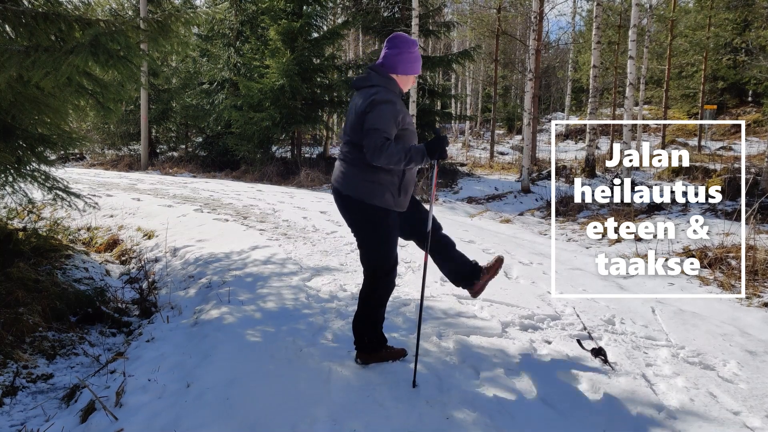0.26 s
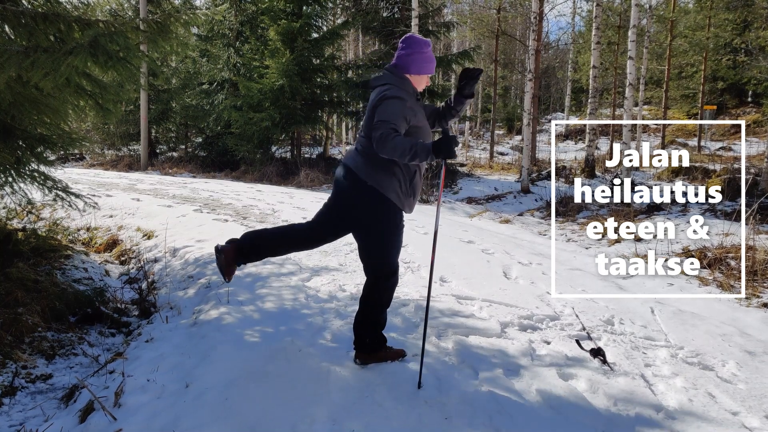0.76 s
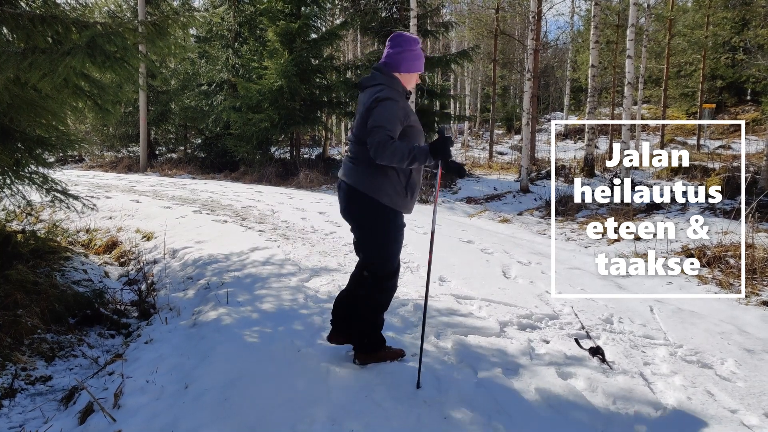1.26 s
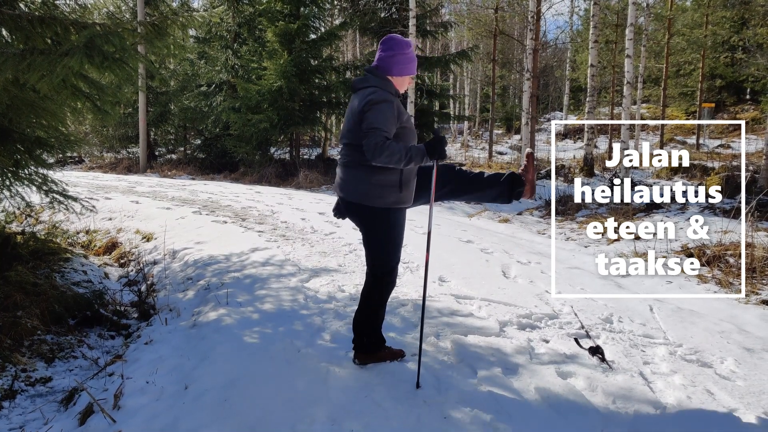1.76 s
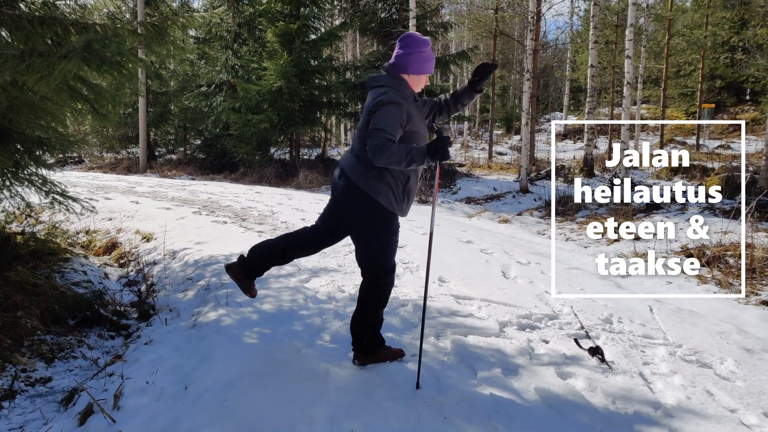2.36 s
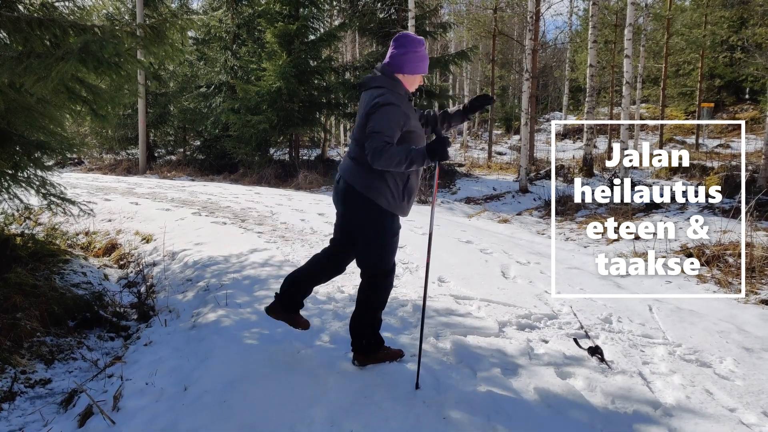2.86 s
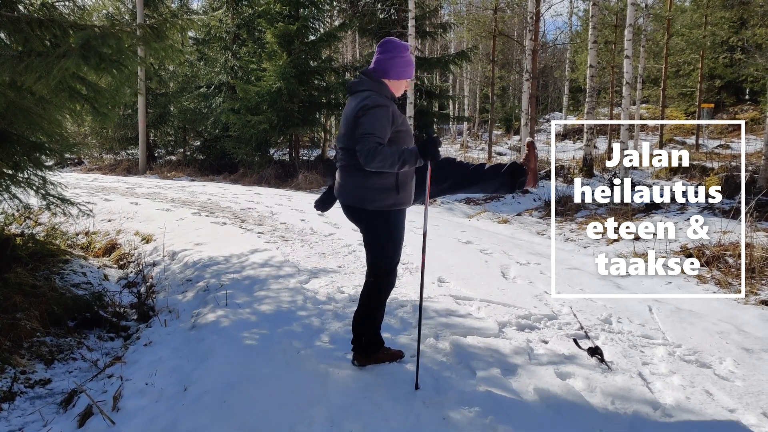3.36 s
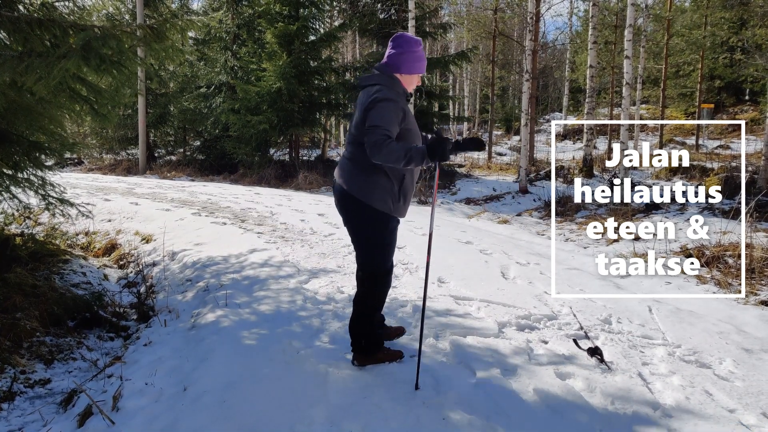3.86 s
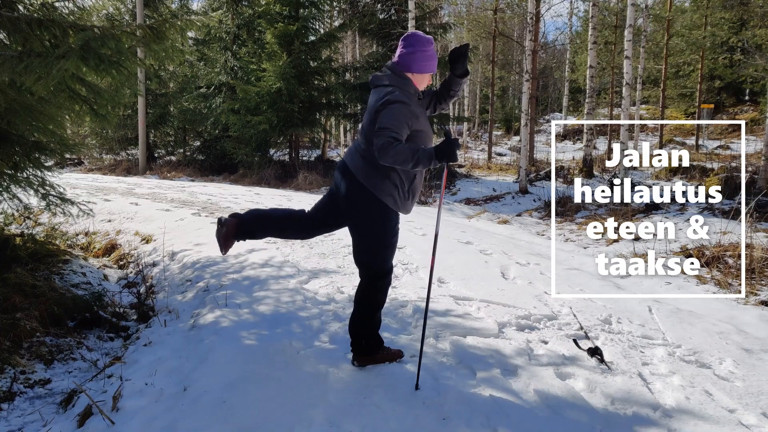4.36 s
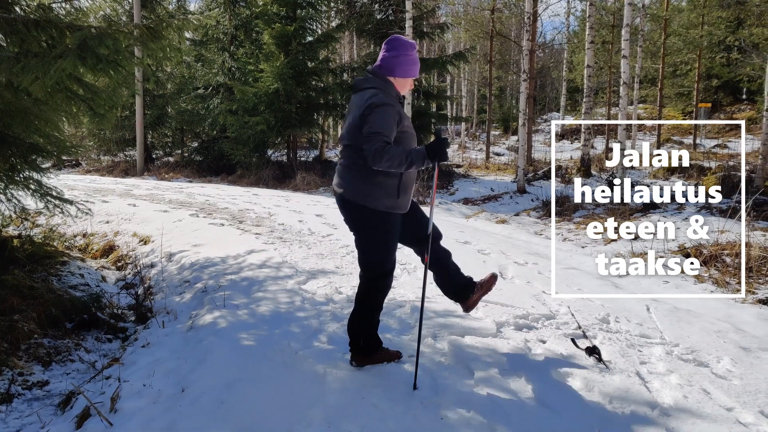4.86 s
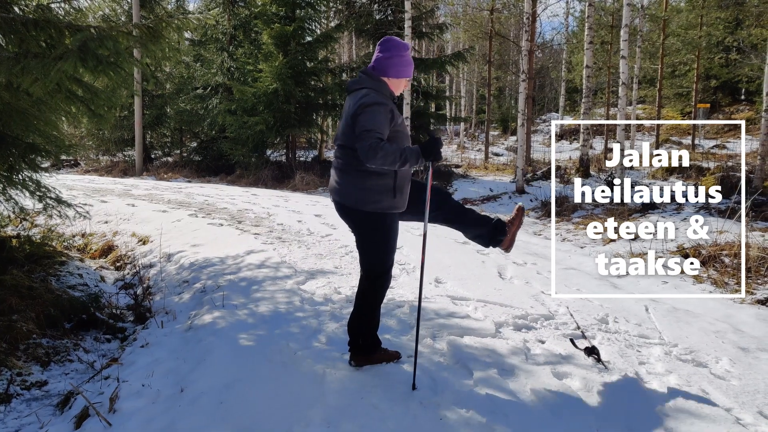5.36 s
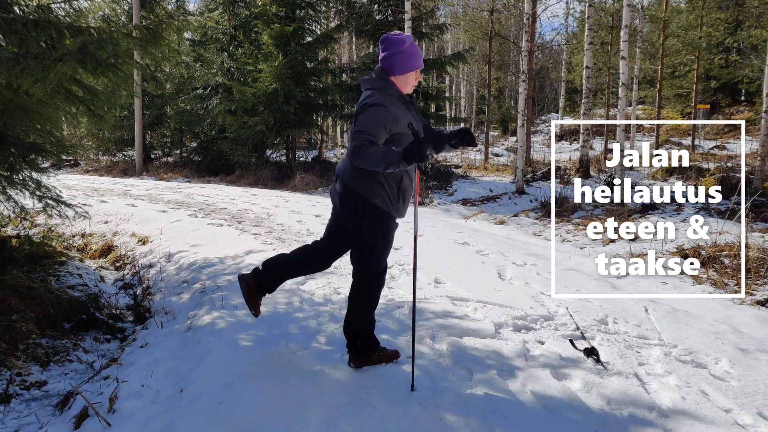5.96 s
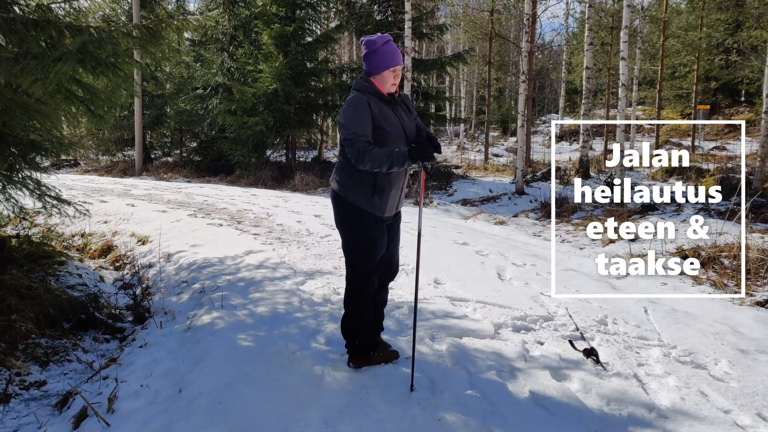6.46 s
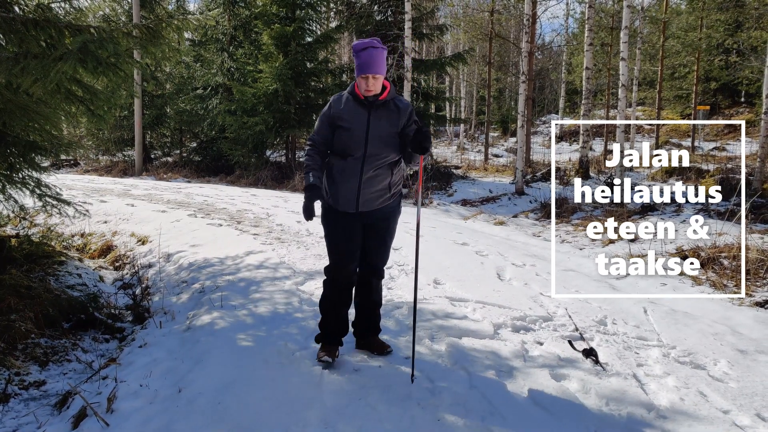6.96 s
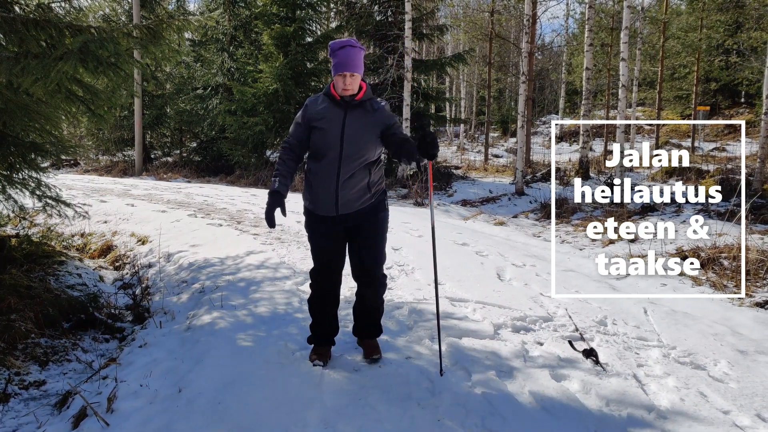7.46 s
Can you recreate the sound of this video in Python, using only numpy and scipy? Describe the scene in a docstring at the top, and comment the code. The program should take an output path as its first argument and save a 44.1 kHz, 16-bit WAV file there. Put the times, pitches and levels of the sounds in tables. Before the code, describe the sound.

Low wind buffets the microphone, strongest at the start, on a snowy forest path. Over it a songbird repeats a clear descending two-note whistle about three times a second, in a short run and then a longer one, with a slight echo. Far birds answer faintly, trees hush, and someone's clothes and boots make a barely audible rustle and crunch late on. The forest sounds sit to the right; the left carries only wind, hiss and a few ticks.

```python
"""A snowy forest. A small bird repeats a two-note falling whistle, a nearly pure tone from its syrinx
that trunks and needles scatter; other birds answer faintly from further off. The trees hush, and
someone exercising on the path rustles and crunches the snow. Turbulent wind buffets both microphones.
The left one is muffled: it picks up only wind, its own hiss and a few sharp ticks."""
import sys
import numpy as np
from scipy import signal
from scipy.fft import rfft, irfft
from scipy.io import wavfile
from scipy.ndimage import uniform_filter1d

SR = 44100
rng = np.random.default_rng(int(sys.argv[2]) if len(sys.argv) > 2 else 0)


def bounce(signal):
    """Save signal as a 16-bit WAV file at the path given by the first command-line argument."""
    frames = np.transpose(np.atleast_2d(signal))
    limited = np.clip(frames, -1, 1)
    pcm = np.round(limited * 32767).astype(np.int16)
    wavfile.write(sys.argv[1], SR, pcm)


N = 339981
TIME = np.arange(N) / SR


def near_bird(leap_s=.011, top_hz=8060, flick_at_s=.099, fall_at_s=.104):
    """Frequency modulation in the syrinx: each phrase is a leap, a swoop, a tiny flick and a fall."""
    # phrases: (time [s], swoop level [dB], glide time [s], plateau pitch [Hz], fall level [dB],
    #   fade [dB/s], first pitch [Hz], last pitch [Hz], bend [1 = straight], dip depth [Hz],
    #   dip time [s], second voice relative to the fall [dB])
    phrases = [(-.045, -26.5, 0.066, 5245, -33, 117, 5300, 4200, 1.8, 0, .015, -12),
               (.299, -30, .05, 5470, -29, 136, 5480, 4270, 2.05, 0, .015, -15),
               (.64, -27, 0.059, 5300, -29, 109, 5180, 4130, 1.35, 80, 0.048, -20),
               (.995, -26.5, 0.064, 5266, -30.5, 105, 5070, 4080, 1.3, 148, 0.016, -4),
               (1.35, -25, .047, 5400, -29.5, 125, 5060, 4136, 1.56, 40, .018, -11),
               (3.189, -35, 0.06, 5340, -36, 95, 5240, 4160, 1.7, 60, 0.018, -12),
               (3.522, -31, 0.049, 5230, -36, 55, 4980, 4020, 1.05, 90, 0.044, -16),
               (3.875, -27, 0.051, 5226, -28, 115, 4980, 4090, 1.25, 218, 0.038, -15),
               (4.225, -28, 0.061, 5310, -31, 79.6, 5200, 4225, 1.5, 90, .025, -14),
               (4.584, -27.5, 0.066, 5190, -29, 78, 5145, 4066, 1.35, 190, .012, -16),
               (4.932, -21.5, .054, 5330, -25, 120, 5080, 4054, 1.2, 68, 0.016, -26),
               (5.298, -23.5, 0.055, 5275, -27.5, 79, 5240, 4140, 1.3, 230, 0.013, -19),
               (5.665, -24.5, 0.051, 5320, -27, 60, 5290, 4215, 1.5, 60, 0.028, -20),
               (6.033, -22.5, 0.047, 5376, -25, 156, 5560, 4050, 1.8, 295, .01, -29)]
    out = np.zeros(N)
    for s, swoop_db, glide_s, plateau_hz, fall_db, fade, first_hz, *contour, second_db in phrases:
        sing(out, s - leap_s, *upstroke(leap_s, 6000, top_hz, swoop_db - 31))
        sing(out, s, *swoop(swoop_db, glide_s, top_hz, plateau_hz), waver=.004, wander=.003)
        sing(out, s + flick_at_s, *upstroke(.009, 4740, 8330, swoop_db - 25))
        second_note = fall(fall_db, fade, first_hz, *contour)
        sing(out, s + fall_at_s, *second_note, waver=.004, wander=.003, flutter_db=1.62)
        sing(out, s + fall_at_s + .012, *second_voice(fall_db + second_db, first_hz), waver=.016)
    return out


def upstroke(length, from_hz, to_hz, db):
    """A linear chirp: a very quick rise in pitch."""
    t = note_times(length)
    return t, from_hz + (to_hz - from_hz) * t / length, np.full(len(t), db)


def swoop(db, glide_s, top_hz, plateau_hz, length=.061, release_s=.017, swell_db_per_s=288):
    """A power-law glide: the first note dives and levels out, growing louder as it drops."""
    t = note_times(length + release_s / 2)
    hz = plateau_hz + (top_hz - plateau_hz) * np.maximum(1 - t / glide_s, 0) ** 2.23
    swell_db = 4.5 - swell_db_per_s * np.maximum(length - t, release_s)
    return t, hz, db + swell_db + gate_db(t, .0054, release_s)


def fall(db, fade, first_hz, last_hz, bend, dip_hz, dip_s, length=.152, attack_s=.042):
    """A glide with exponential decay: the second note dips briefly and sinks ever more slowly."""
    t = note_times(length)
    hz = last_hz + (first_hz - last_hz) * np.maximum(1 - t / length, 0) ** bend
    hz -= dip_hz * np.exp(-((t - dip_s) / .013) ** 2)
    return t, hz, db - fade * np.maximum(t - attack_s, 0) + gate_db(t, attack_s, release_s=.028)


def second_voice(db, first_hz, above_hz=87, length=.04):
    """Beating: the other side of the syrinx joins a little higher and roughens the start of the fall."""
    t = note_times(length)
    return t, np.full(len(t), first_hz + above_hz), db + gate_db(t, length / 10, length / 2)


def sing(track, s, t, hz, db, waver=.0041, wander=.004, flutter_db=2.0, overtone_db=-46):
    """Add a nearly pure tone at time s, with random frequency and amplitude modulation."""
    span = np.flatnonzero((TIME >= s) & (TIME < s + t[-1]))
    age = TIME[span] - s
    white = rng.standard_normal((3, SR // 4))
    wobble, flutter, stray = [unit_rms(uniform_filter1d(row, size=width))[:len(age)]
                              for row, width in zip(white, (150, 400, 1000))]
    pitch = np.interp(age, t, hz) * (1 + waver * wobble + wander * stray)
    phase = 2 * np.pi * np.cumsum(pitch) / SR
    envelope = signal.windows.tukey(len(age), .04) * from_db(np.interp(age, t, db) + flutter_db * flutter)
    track[span] += envelope * (np.sin(phase) + from_db(overtone_db) * np.sin(2 * phase))


def far_whistles(drop_s=.0217, drop_hz=550, rasp_above_hz=7200):
    """Thin chirps sag, then drop away; deeper frequency modulation makes the highest ones rasp."""
    # far birds' whistles: (time [s], length [s], starting pitch [Hz], sag [Hz/s], level [dB])
    whistles = [(1.927, 0.08, 7780, 6100, -54.5), (2.041, 0.063, 7500, 1000, -54),
                (2.614, 0.12, 6930, 9750, -57.5), (2.838, 0.15, 6500, 6800, -65.5),
                (6.876, 0.12, 6700, 8540, -60.5), (7.094, 0.15, 6680, 9050, -58),
                (7.309, .06, 6200, 13800, -63)]
    out = np.zeros(N)
    for s, length, start_hz, sag, db in whistles:
        t = note_times(length)
        hz = start_hz - sag * t - drop_hz * np.maximum(1 - (length - t) / drop_s, 0)
        rasp = .015 if start_hz > rasp_above_hz else .004
        sing(out, s, t, hz, db + gate_db(t, attack_s=.031, release_s=.019), waver=rasp, wander=0)
    return out


def far_chatter(step_s=.075, syllable_s=.062, base_hz=3220, arch_hz=342, fade_db_per_s=13):
    """Random frequency modulation makes rising syllables hoarse; each run arches in pitch and fades."""
    # runs of chatter: (time [s], length [s], starting level [dB])
    runs = [(0.254, .42, -48.5), (4.158, 0.39, -56.5)]
    out, t = np.zeros(N), note_times(syllable_s)
    rise = 1 + .242 * (t / syllable_s - .5)
    half_s = syllable_s / 2
    for s, length, db in runs:
        for age in np.arange(0, length, step_s):
            hz = (base_hz + arch_hz * np.sin(np.pi * age / length)) * rise
            level_db = db - fade_db_per_s * age + gate_db(t, half_s, half_s)
            sing(out, s + age - half_s, t, hz, level_db, waver=.1087)
    return out


def needle_scatter(x, above_hz=6300):
    """Scattering: twigs and needles return only short wavelengths, a brief haze behind each swoop."""
    t = TIME[:SR // 4]
    haze = rng.standard_normal(len(t)) * np.exp(-t / .035) * (1 - np.exp(-t / .003))
    haze = butter(with_energy(haze, -7), above_hz, "high", order=8)
    return x + signal.fftconvolve(x, haze)[:N]


def forest_echo(x, trunks_db, tail_db, echoes_per_s=900, t60_s=.48, tail_cut_hz=5600):
    """Reverberation: near trunks reflect separate echoes; the deeper wood adds a dull, diffuse tail."""
    t = TIME[:SR]
    trunks = rng.standard_normal(SR) * (rng.random(SR) < echoes_per_s / SR)
    trunks *= np.exp(-t / .033) * (t > .002)
    tail = rng.standard_normal(SR) * from_db(-60 * t / t60_s) * (1 - np.exp(-t / .12))
    tail = butter(with_energy(tail, tail_db), tail_cut_hz, "low")
    return x + signal.fftconvolve(x, with_energy(trunks, trunks_db) + tail)[:N]


def deep_echo(x, onset_s=.04, decay_s=.052, below_hz=4350):
    """Late reflection: only low pitches return from deep in the wood, so each fall's end lingers."""
    t = TIME[:SR // 2]
    echo = rng.standard_normal(len(t)) * np.exp(-t / decay_s) * (1 - np.exp(-(t / onset_s) ** 2))
    echo = butter(with_energy(echo, -13), below_hz, "low", order=16)
    return signal.fftconvolve(x, echo)[:N]


def left_wind(level_db):
    """Turbulent pressure on the left port makes a very deep rumble."""
    # rumble spectrum: (frequency [Hz], relative density [dB])
    rumble = [(14, 13.5), (25, -12), (50, -6), (100, -25.5), (200, -36), (500, -51)]
    return turbulence(rumble, level_db)


def right_wind(level_db, strong_db=-25):
    """Turbulence on the right port: light wind rumbles; in a strong gust higher buffeting takes over."""
    # spectra of light wind and of a strong gust: (frequency [Hz], relative density [dB])
    rumble = [(14, -3.5), (25, 6), (50, 3.5), (100, -8), (180, -22), (350, -51), (700, -52)]
    buffet = [(50, 1), (90, 15), (150, 5), (250, -3), (400, -7), (700, -46)]
    share = np.clip(from_db(-3 + 1.54 * (level_db - strong_db)), 0, .95)
    return np.sqrt(1 - share ** 2) * turbulence(rumble, level_db) + share * turbulence(buffet, level_db)


def turbulence(spectrum, level_db):
    """Random pressure on a port, its short-term rms following the strength of the wind."""
    flow = noise(spectrum)
    return from_db(level_db) * flow / np.sqrt(uniform_filter1d(flow ** 2, size=6000) + 1e-9)


def strong_puffs(microphone):
    """Pressure bursts from the strongest eddies that reach one microphone."""
    # eddies: (time [s], length [s], level [dB], eddy frequency [Hz], microphone [left or right])
    eddies = [(0.089, 0.02, -22, 125, "right"), (0.197, 0.039, -19.5, 158, "right"),
              (0.267, 0.032, -16, 169, "right"), (0.29, 0.024, -13, 275, "right"),
              (0.324, 0.023, -16.5, 155, "right"), (.412, 0.013, -13, 141, "right"),
              (.436, 0.016, -20, 208, "right"), (.625, 0.019, -22.5, 144, "right"),
              (.722, 0.024, -15.5, 194, "right"), (1.186, 0.034, -29, 108, "right"),
              (1.406, 0.016, -30.5, 133, "right"), (1.761, 0.01, -20, 217, "right"),
              (1.776, 0.018, -22, 114, "right"), (1.95, .0085, -24, 139, "right"),
              (2.773, .016, -22, 35.8, "left"), (2.776, 0.043, -37.5, 95, "right"),
              (3.168, 0.0058, -18, 54.3, "left"), (3.762, 0.081, -32.5, 69.4, "right"),
              (5.25, .04, -26.5, 65, "right"), (5.576, 0.04, -27.5, 48, "left")]
    return puffs([row for *row, side in eddies if side == microphone])


def small_puffs(wind_db, gust_db=-33, gust_rate_per_s=12, length=.012, eddy_hz=125):
    """Lesser eddies arrive as a Poisson process, rarer and weaker as the wind drops."""
    rate = gust_rate_per_s * np.minimum(from_db(wind_db - gust_db) ** 2, 1)
    arrivals = np.flatnonzero(rng.random(N) < rate / SR)
    return puffs([(TIME[i], length, wind_db[i] - 3.5 + 2 * rng.standard_normal(), eddy_hz)
                  for i in arrivals])


def puffs(rows):
    """Eddies strike a port as bursts of band-limited pressure; faster ones shake it at a higher rate."""
    out = np.zeros(N)
    for s, length, db, eddy_hz in rows:
        near = np.abs(TIME - s) < .25
        envelope = np.exp(-2 * ((TIME[near] - s) / length) ** 2)
        pressure = butter(rng.standard_normal(near.sum()), .4 * eddy_hz, "high")
        puff = envelope * butter(pressure, 1.222 * eddy_hz, "low", order=4)
        out[near] += with_energy(puff, db) * np.linalg.norm(envelope)
    return out


def port_ticks():
    """Cavity resonance: a tick rings the tiny left port and gives the membrane a dull push."""
    # ticks on the port: (time [s], level [dB])
    ticks = [(3.671, -26.5), (3.991, -21), (5.995, -29), (6.879, -38)]
    clicks = impulses(ticks)
    return ring(clicks, hz=15100, t60_s=.0022) + .65 * ring(clicks, hz=116, t60_s=.012)


def knocks():
    """Impacts excite four heavily damped modes: two dry taps."""
    # light knocks: (time [s], excitation level [dB])
    strikes = [(.152, -28), (.164, -30.5)]
    taps = impulses(strikes)
    return (1.36 * ring(taps, 740, .008) - .81 * ring(taps, 1320, .011)
            + .37 * ring(taps, 2400, .011) - .2 * ring(taps, 3200, .005))


def jacket_and_boots(grain_db=.5, grain_hz=250):
    """Friction noise: a jacket rustles and boots crunch snow in short, grainy swells."""
    # rustles and steps: (time [s], length [s], level [dB])
    rustles = [(2.28, 0.24, -64.5), (6.48, .012, -58), (6.69, 0.054, -61), (6.765, 0.036, -55.5),
               (6.87, 0.12, -61), (7.517, .012, -57.5), (7.662, .025, -58)]
    # their spectrum: (frequency [Hz], relative density [dB])
    crunch = [(1500, -18), (3500, -15), (5000, -0.5), (8000, -5), (9500, -13), (15000, -19)]
    envelope = sum(from_db(db) * bell_curve(s, length) for s, length, db in rustles)
    return envelope * unit_rms(noise(crunch) * from_db(-grain_db * drift(grain_hz)))


def trees(background_db):
    """Aerodynamic noise: a broad, slightly flickering hush and the low roar of distant treetops."""
    # spectra of the hush and of the roar: (frequency [Hz], relative density [dB])
    hush_spectrum = [(60, -3), (180, -6), (260, -1), (360, 0), (480, -1), (600, -2.5), (850, -5.5),
                     (1250, -8.5), (2400, -18), (3500, -21), (7000, -22.5), (9500, -30.5), (15000, -33.5)]
    roar_spectrum = [(130, -8.5), (250, -2), (360, -0.5), (500, -3), (800, -18), (1500, -28)]
    # strength of the roar: (time [s], level [dB])
    roar_levels = [(0, -50), (2.7, -60.5), (4.5, -55), (5.8, -47), (6.9, -57), (7.7, -55)]
    roar_db, = in_time(roar_levels)
    hush = from_db(background_db + 22.5 + .58 * drift(hz=16.6)) * noise(hush_spectrum)
    return hush + from_db(roar_db) * noise(roar_spectrum)


def microphone_hiss(background_db):
    """Self-noise: each microphone has its own hiss, the left one louder."""
    # hiss spectra: (frequency [Hz], relative density [dB])
    left = [(150, 15), (350, 8), (1200, 1.5), (2400, -0.5), (4500, -9), (7000, -9), (10000, -2.5),
            (14500, 2.5), (16000, 3.5)]
    right = [(150, -12), (4000, -11), (10000, -15), (14500, -6), (16000, -14)]
    return [from_db(background_db + 11) * noise(left), from_db(background_db + 2) * noise(right)]


def from_db(db):
    """Decibels to amplitude gain."""
    return 10 ** (np.asarray(db) / 20)


def unit_rms(x):
    """Normalise to unit power."""
    return x / np.sqrt(np.mean(x ** 2) + 1e-20)


def with_energy(x, db):
    """Normalise total energy to db, relative to a unit impulse."""
    return from_db(db) * x / np.linalg.norm(x)


def in_time(rows):
    """Linear interpolation of each column of a curve at every sample."""
    s, *columns = np.transpose(rows)
    return [np.interp(TIME, s, column) for column in columns]


def note_times(length):
    """Control points through a note, in seconds after its start."""
    return np.linspace(0, length, num=64)


def gate_db(t, attack_s, release_s):
    """Envelope with smooth attack, hold and release, in dB."""
    opening = np.clip(t / attack_s, 0, 1) * np.clip((t[-1] - t) / release_s, 0, 1)
    return 20 * np.log10(np.sin(np.pi / 2 * opening) + 1e-3)


def bell_curve(s, length):
    """Gaussian envelope centred on time s."""
    return np.exp(-2 * np.minimum(((TIME - s) / length) ** 2, 20))


def butter(x, hz, kind, order=2):
    """Causal Butterworth filter."""
    return signal.sosfilt(signal.butter(order, hz, kind, fs=SR, output="sos"), x)


def drift(hz):
    """Low-passed noise: a slow random wander of unit rms."""
    return unit_rms(butter(rng.standard_normal(N + SR), hz, "low")[SR:])


def noise(spectrum):
    """Spectral shaping: unit-rms noise of a given colour, dying away outside its range."""
    hz, db = np.transpose(spectrum)
    f = np.maximum(np.fft.rfftfreq(N, 1 / SR), 1)
    gain = from_db(np.interp(np.log(f), np.log(hz), db))
    roll_off = (1 + (hz[0] / 2 / f) ** 4) * (1 + (f / 2 / hz[-1]) ** 4)
    return unit_rms(irfft(rfft(rng.standard_normal(N)) * gain / roll_off, N))


def impulses(rows):
    """One impulse for each row of (time [s], level [dB])."""
    out = np.zeros(N)
    for s, db in rows:
        out[round(s * SR)] = from_db(db)
    return out


def ring(clicks, hz, t60_s):
    """Damped resonator: a unit impulse starts a decaying sine of height 1."""
    radius, angle = 10 ** (-3 / (t60_s * SR)), 2 * np.pi * hz / SR
    feedback = [1, -2 * radius * np.cos(angle), radius ** 2]
    return signal.lfilter([0, np.sin(angle)], feedback, clicks + 1e-18)


def scene():
    """Superposition: birds and forest reach the right microphone; each has its own wind and hiss."""
    # wind strength at the ports: (time [s], left reference level [dB], right reference level [dB])
    wind = [(0, -49, -32.5), (.15, -49, -23.5), (.8, -43.5, -27), (.97, -51, -39.5), (1.2, -40, -30.5),
            (1.55, -54, -35.5), (1.9, -52, -31), (2.45, -54.5, -43.5), (3.0, -58, -48), (3.27, -48, -46.5),
            (4.3, -51, -47), (5.25, -47.5, -35.5), (5.63, -39.5, -43), (6.1, -52.5, -45), (6.7, -59, -48.5),
            (7.7, -55.5, -47)]
    # slow drift of gain, raising and lowering hush and hiss together: (time [s], reference level [dB])
    background_level = [(0.0, -71), (1.22, -71), (1.48, -70), (2.34, -72), (2.51, -74.5), (2.77, -74.5),
                        (3.91, -71), (4.62, -72.5), (4.83, -70.5), (6.29, -71.5), (6.57, -74.5),
                        (7.71, -75)]
    wind_left_db, wind_right_db = in_time(wind)
    background_db, = in_time(background_level)
    song = near_bird()
    near = forest_echo(needle_scatter(song), trunks_db=-12.5, tail_db=-16.5) + deep_echo(song)
    far = forest_echo(far_whistles() + far_chatter(), trunks_db=-4.5, tail_db=-16)
    outdoors = near + far + trees(background_db) + knocks() + jacket_and_boots()
    hiss = microphone_hiss(background_db)
    left = port_ticks() + left_wind(wind_left_db + 10) + strong_puffs("left")
    right = outdoors + right_wind(wind_right_db - 3) + strong_puffs("right") + small_puffs(wind_right_db)
    return np.array([left, right]) + hiss


def record(dry):
    """Band limiting: an elliptic low-pass cuts the top steeply."""
    cutoff_hz = 15900
    return signal.sosfilt(signal.ellip(10, .1, 80, cutoff_hz, fs=SR, output="sos"), dry)


dry = scene()
out = record(dry)
bounce(out)
```